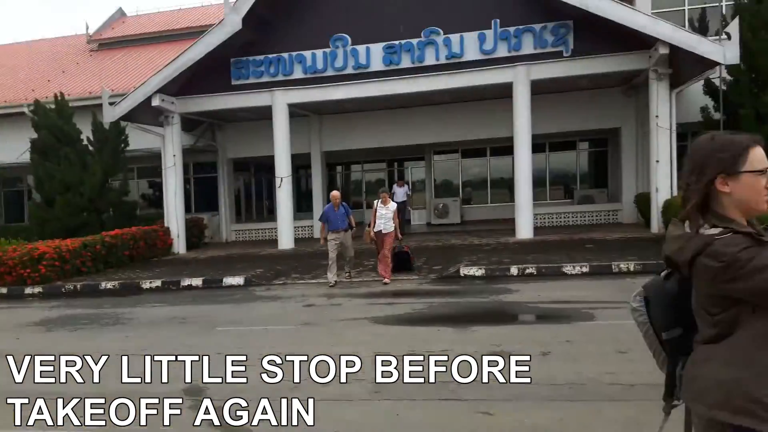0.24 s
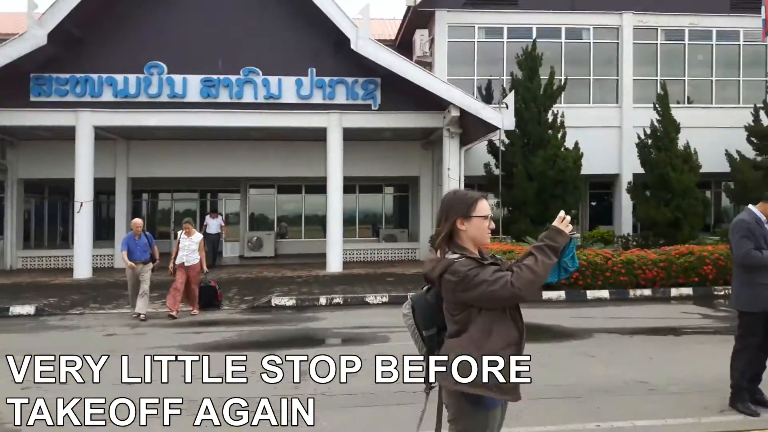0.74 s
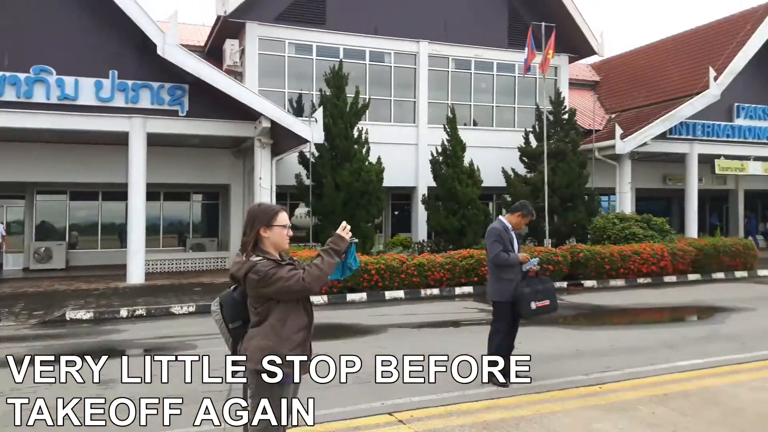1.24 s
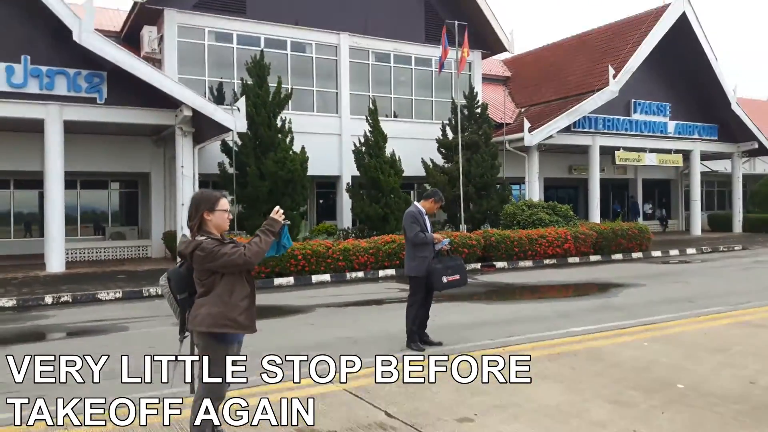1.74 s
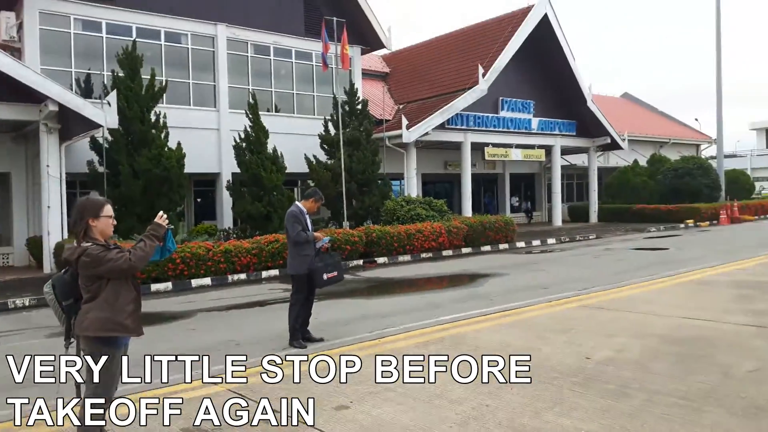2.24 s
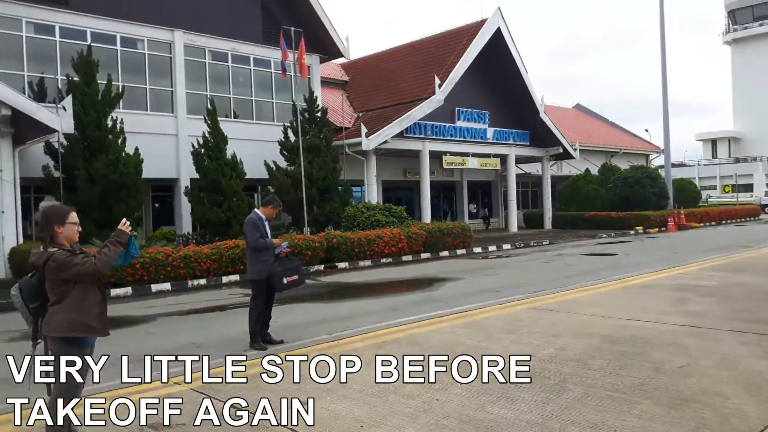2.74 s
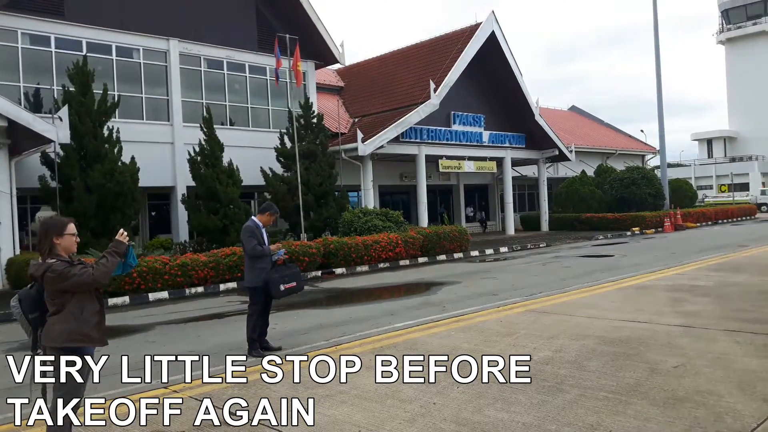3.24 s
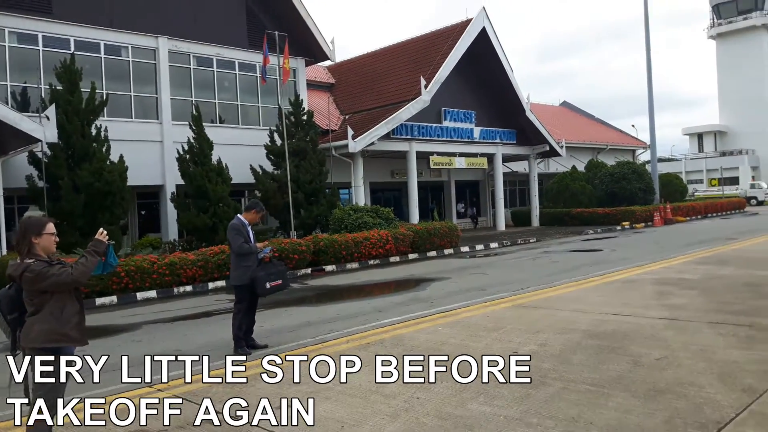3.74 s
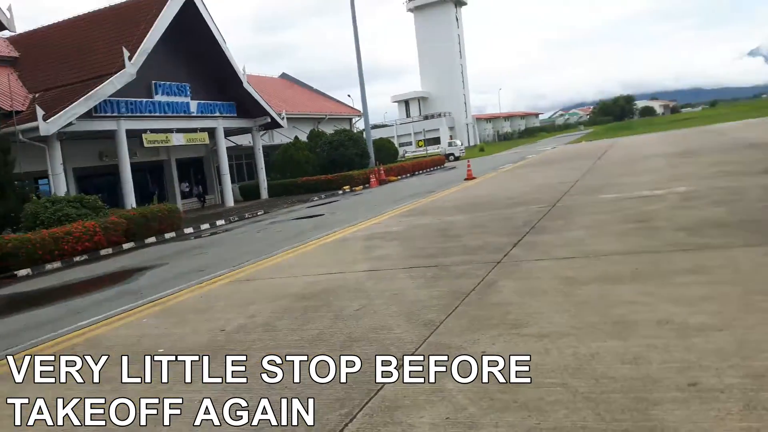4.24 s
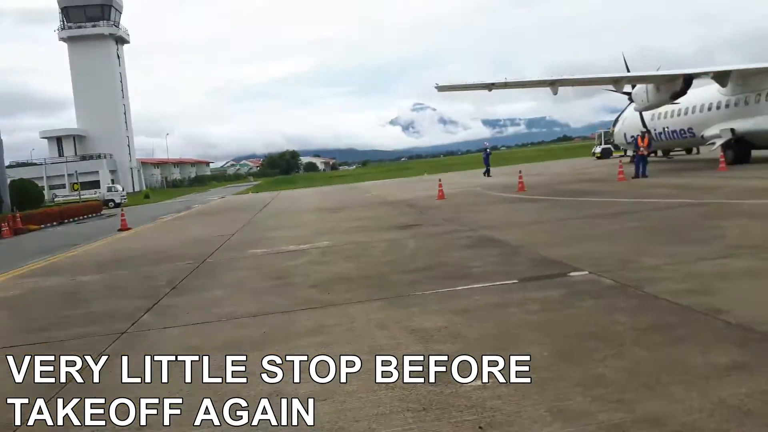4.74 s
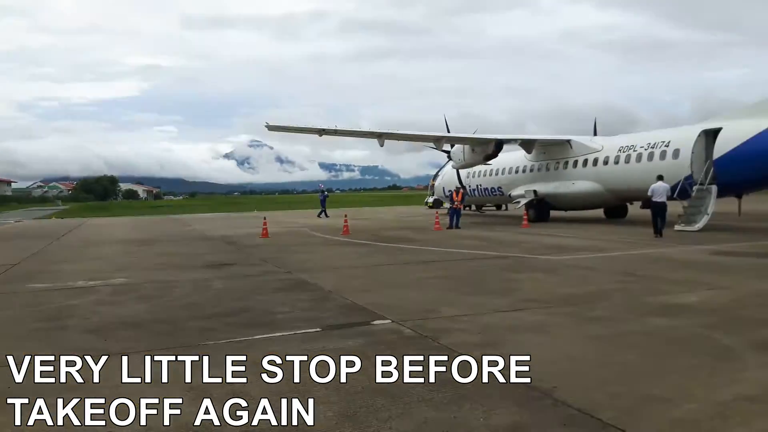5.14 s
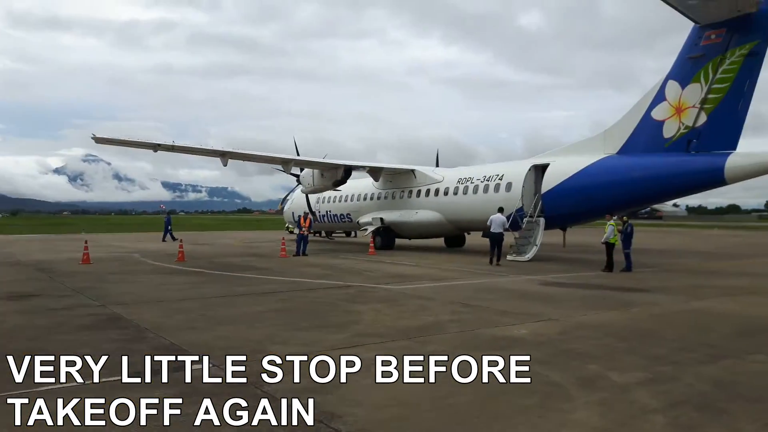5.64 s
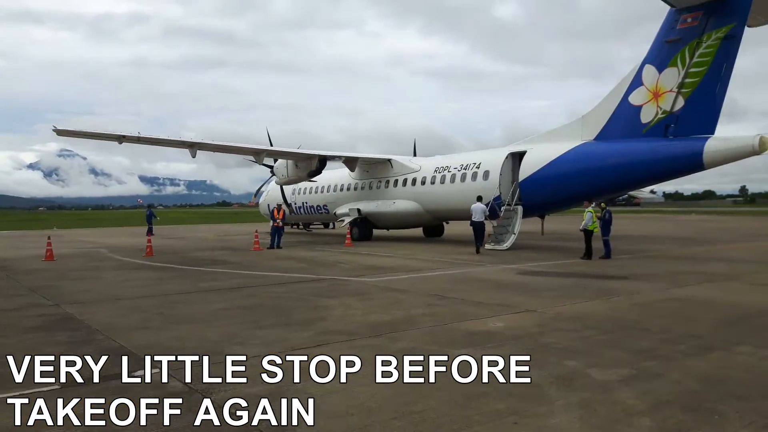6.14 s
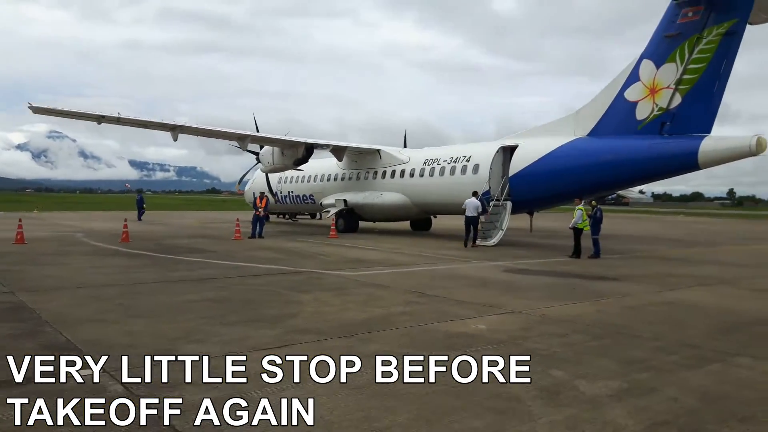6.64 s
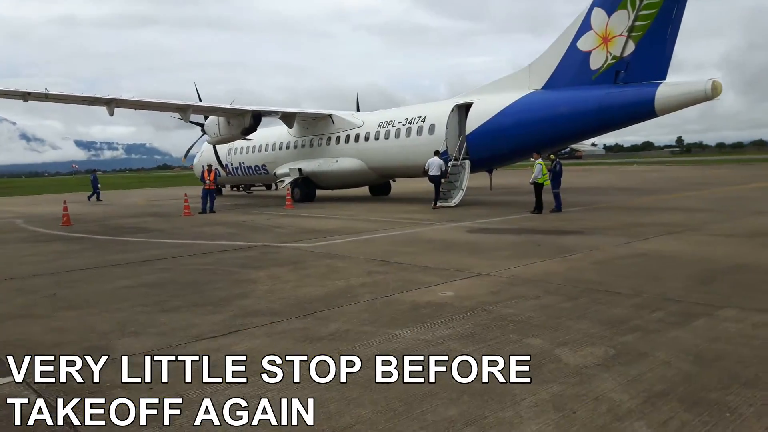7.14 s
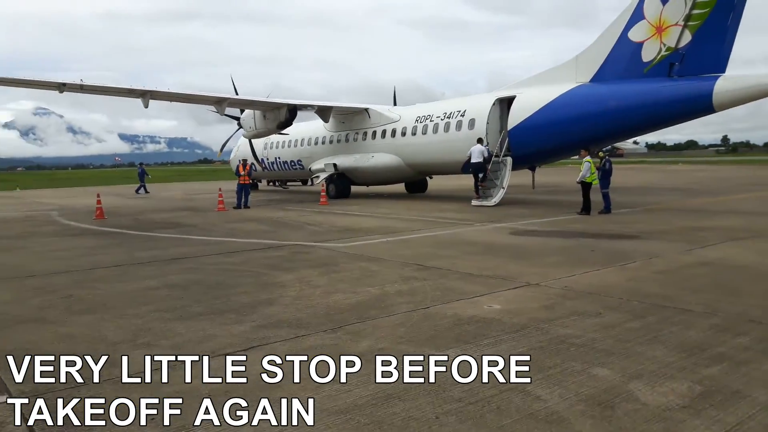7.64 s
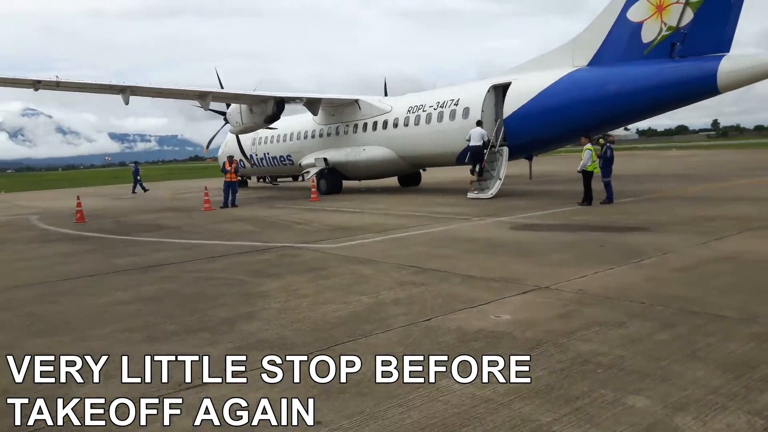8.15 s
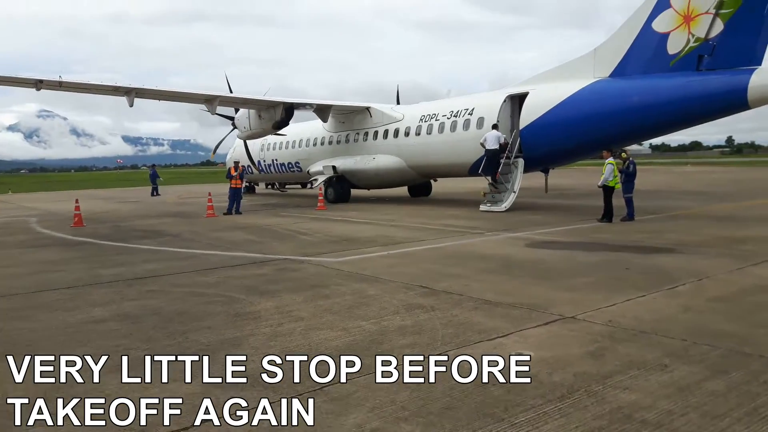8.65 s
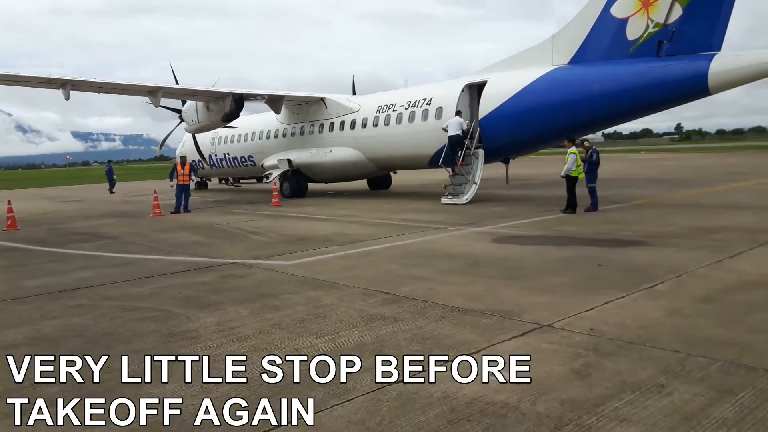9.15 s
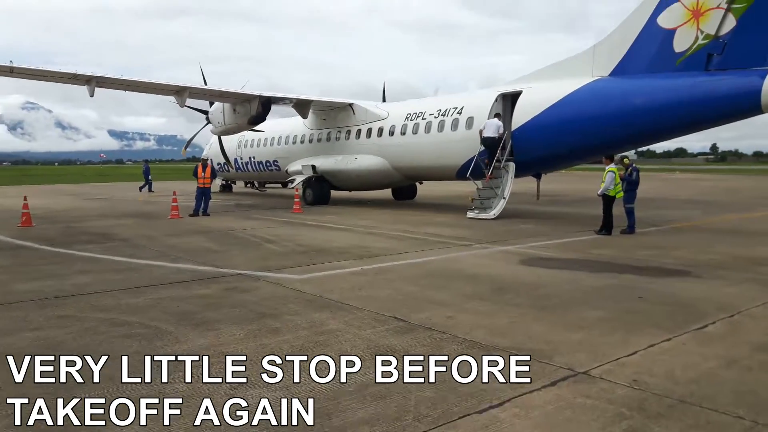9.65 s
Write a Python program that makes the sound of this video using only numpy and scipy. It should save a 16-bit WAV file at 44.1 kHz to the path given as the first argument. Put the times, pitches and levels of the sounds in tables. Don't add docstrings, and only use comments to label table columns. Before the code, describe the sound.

Loud gusts thump and crackle for under a second, giving way to an aircraft engine's uneven boom, growing hiss and rising rotor whine.

```python
import sys
import numpy as np
from scipy import signal
from scipy.fft import rfft, irfft
from scipy.io import wavfile
from scipy.ndimage import uniform_filter1d

SR = 44100
rng = np.random.default_rng(int(sys.argv[2]) if len(sys.argv) > 2 else 0)


def boost_factor(decibels):
    exponent = np.asarray(decibels, float) / 20
    return 10 ** exponent


def transcribe(signal):
    frames = np.atleast_2d(signal).T
    limited = np.clip(frames, -1, 1)
    pcm = np.round(limited * 32767).astype(np.int16)
    wavfile.write(sys.argv[1], SR, pcm)


N = 436149
T_S = np.arange(N) / SR
FRAMES, HZ = N // 256 + 5, np.fft.rfftfreq(1024, 1 / SR)[:, None]
FRAME_S = np.arange(FRAMES) * 256 / SR


def evened(x):
    return x / np.sqrt(np.mean(x ** 2) + 1e-20)


def smooth_twice(x, size):
    return uniform_filter1d(uniform_filter1d(x, size=size), size=size)


def blurred(x, bins, frames):
    return uniform_filter1d(uniform_filter1d(x, size=bins, axis=0), size=frames, axis=1)


def read(points, hz):
    f, value = np.transpose(points)
    return np.interp(np.log(hz + 1), np.log(f + 1), value)


def curves(rows, t):
    s, *columns = np.transpose(rows)
    return [np.interp(t, s, c) for c in columns]


def window(t, start, end, rise, fall):
    return np.clip((t - start) / rise, 0, 1) * np.clip((end - t) / fall, 0, 1)


def bump(t, center_s, half_s):
    return np.exp(-((t - center_s) / half_s) ** 2)


def add(mix, s, sound):
    part = mix[max(round(s * SR), 0):][:len(sound)]
    part += sound[:len(part)]


def band_db(shape_db, lo, hi):
    return 10 * np.log10(np.sum(boost_factor(shape_db) ** 2 * ((HZ > lo) & (HZ < hi)), axis=0) + 1e-20)


def turbulence(shape_db, patchy_db, flicker_db):
    a, b, patches = np.transpose(rng.standard_normal((FRAMES, len(HZ), 3)))
    patches = evened(blurred(patches, 9, 12))
    flicker = evened(uniform_filter1d(rng.standard_normal(FRAMES), size=10))
    z = (a + 1j * b) * boost_factor(shape_db + patchy_db * patches + flicker_db * flicker)
    return signal.istft(z, nperseg=1024, noverlap=768)[1][:N] * np.sqrt(0.5)


def low_noise(spectrum, level_db, steady, size=3500):
    hz = np.fft.rfftfreq(N, 1 / SR)
    noise = evened(irfft(rfft(rng.standard_normal(N)) * boost_factor(read(spectrum, hz)), N))
    beating = smooth_twice(noise ** 2, size)
    return evened(noise / beating ** (steady / 2)) * boost_factor(level_db)


def eddy(hz, ring):
    u = np.arange(-.008, .03, 1 / SR) * hz
    envelope = np.exp(-(u / np.where(u < 0, .65, ring)) ** 2)
    return np.cos(2 * np.pi * u) * envelope * signal.windows.tukey(len(u), .3)


def eddies(pitches, per_s, count):
    stream = np.zeros(count)
    for hz in pitches:
        size = boost_factor(4 * np.minimum(rng.exponential(1, count), 3))
        clicks = (rng.random(count) < per_s / SR) * rng.choice([-1, 1], count) * size
        stream += signal.oaconvolve(clicks, eddy(hz, ring=0.57))[:count] / hz ** 0.81
    return stream / np.sqrt(uniform_filter1d(stream ** 2, size=2500) + 1e-12)


# time in seconds, level in dB.
GUST = [
    (0, -13),
    (.085, -15.5),
    (.146, -9),
    (.185, -13),
    (.28, -3.5),
    (.46, -13.5),
    (.505, -15),
    (.585, -27),
    (.635, -12),
]


def gust_stream(count):
    t = np.arange(count) / SR
    gust_db = curves(GUST, t)[0] - 351 * np.maximum(t - GUST[-1][0], 0)
    thuds = eddies((90, 130, 180, 240, 320), 60, count)
    crackle = boost_factor(-23 + .4 * (gust_db + 15)) * eddies((380, 480, 620, 800, 1100), 90, count)
    fade = np.clip((count - np.arange(count)) / 3000, 0, 1)
    return (thuds + crackle) * boost_factor(gust_db - 9.0) * fade


def burst(db, hz, crack_db):
    slope = np.interp(db + crack_db, (-26, -12), (3.0, 2.2))
    crack = 0
    for tear_hz in (550, 800, 1200, 1750, 2500):
        part = eddy(tear_hz * rng.uniform(.85, 1.15), ring=1.2)
        late_s = rng.uniform(-1, 1) * .0008
        crack = crack + np.roll(part, round(late_s * SR)) * (900 / tear_hz) ** slope
    return boost_factor(db - 1.7) * (eddy(hz, ring=0.46) + boost_factor(crack_db - 0.5) * crack)


# time in seconds, level in dB.
BUFFET = [(0.0, -26), (0.36, -25), (1.54, -38.5), (1.68, -30), (3.58, -52), (4.35, -32), (4.74, -37.5),
          (6.83, -30.5), (6.94, -46), (8.54, -32), (9.61, -51), (9.89, -43)]
# frequency in Hz, density in dB per Hz.
BUFFET_SHAPE = [(15, -72), (25, -38), (54, -10), (81, -6), (97, -3.5), (110, -4), (140, -28), (240, -120)]
# time in seconds, peak in dB, pitch in Hz, crack in dB above the peak.
POPS = [(0.0287, 0.5, 216, -37), (0.0382, -20, 200, -31), (0.0482, -10, 262, -33),
        (0.0582, 1.5, 215, -18.5), (0.0917, -6, 280, -23), (0.1187, -5, 170, -39), (.132, -7, 200, -36),
        (0.1374, -8, 260, -13.5), (.1397, -5.5, 380, -12), (0.1442, 0.5, 195, -35), (.183, -15, 170, -39),
        (.198, -13, 220, -27), (0.22, -8, 250, -25), (0.23, -15, 260, -27), (0.239, -13.5, 280, -11.5),
        (0.2463, -7, 219, -27), (.2518, -8, 230, -37), (0.2602, -11, 240, -34.5), (0.265, -6, 230, -35),
        (0.2738, -6, 300, -26), (.281, -16, 200, -20), (.285, -11, 280, -32), (0.295, -5, 200, -20.5),
        (0.3041, -3.5, 217, -31), (0.3193, -7.5, 220, -20), (0.329, -3.5, 234, -29.5),
        (0.3425, -4, 260, -22), (0.3438, -8, 340, -16), (0.355, -3.5, 198, -26), (0.3702, -12, 280, -18),
        (.379, -11, 250, -32), (0.384, -8, 230, -36), (0.404, -9, 245, -18), (0.4226, -10, 200, -32),
        (0.433, -12.5, 302, -14.5), (0.4377, -14.5, 400, -19), (0.4467, -8.5, 200, -37),
        (0.4546, -12.5, 300, -23), (0.4928, -8, 220, -31), (0.506, -7.5, 170, -36), (0.5142, -7, 150, -40),
        (0.5352, -12, 228, -34), (.5422, -8.5, 179, -40), (0.5664, -13, 300, -34), (0.6034, -6, 198, -38),
        (0.617, -5.5, 249, -31), (.634, -15, 393, -23), (0.675, -13, 228, -38), (1.174, -11, 151, -45),
        (1.236, -16, 155, -36)]
# time in seconds, peak in dB, pitch in Hz, crack in dB above
MORE_POPS = [(.066, -15, 300, -26), (.109, -13, 200, -36), (.155, -9, 130, -42), (.523, -20, 350, -22),
             (0.5627, -18, 320, -24), (0.0342, -12, 300, -24), (.1386, -11, 1150, -7),
             (0.1413, -22, 1450, -11), (0.0257, -16, 520, -25), (.61, -16, 260, -34),
             (.6365, -18, 420, -22)]


def wind():
    count = int(.72 * SR)
    out = low_noise(BUFFET_SHAPE, curves(BUFFET, T_S)[0] + 0.47, steady=0.36)
    out[:count] += gust_stream(count)
    for s, db, hz, crack_db in POPS + MORE_POPS:
        add(out, s - .0081, burst(db, hz, crack_db))
    out = np.clip(out, -.97, .97)
    out = signal.sosfiltfilt(signal.butter(3, (46, 3300), "band", fs=SR, output="sos"), out)
    out[:700] += boost_factor(-7.5) * eddy(138, ring=0.32)[round(.008 * SR):][:700]
    return out


def drifting_dip(row, width_hz):
    start, end, from_hz, to_hz, depth_db = row
    center_hz = np.interp(FRAME_S, (start, end), (from_hz, to_hz))
    band = np.exp(-.5 * ((HZ - center_hz) / width_hz) ** 2)
    return depth_db * window(FRAME_S, start, end, .3, .3) * band


# frequency in Hz, width in Hz, lift in dB.
DUCT = [(605.5, 31, 8), (805, 38, 7.5), (1450, 54, -0.5), (2140, 110, 2), (2820, 33, -2.5), (3504, 58, 6)]
# start in seconds, end in seconds, from in Hz, to in Hz, depth in dB (negative lifts).
ECHOES = [(0.6, 1.6, 2300, 2600, 6), (4, 5.5, 2050, 2130, 7.5), (5.0, 10.2, 1870, 1710, 7),
          (0.5, 1.37, 2900, 3300, -6.5), (.85, 1.95, 3250, 4150, -5.5), (2.5, 4.4, 3000, 3400, -3.5),
          (4.5, 5.63, 2960, 2850, 8.5), (5.5, 10.2, 2400, 3430, 2.5), (-.3, .6, 3600, 3650, -4),
          (8.8, 10.2, 2250, 2300, -3), (-2, 1.9, 8500, 7400, 4), (.55, 1.2, 7550, 7400, 4),
          (4.0, 5.5, 7350, 7050, 4), (4.35, 5.5, 6350, 6500, 4), (5.2, 7.15, 7900, 8000, 10),
          (6.75, 8.4, 7620, 7550, 8), (8.1, 10.2, 7450, 7500, 6), (-.3, 2.3, 10000, 9400, 6),
          (4.1, 5.4, 10250, 10450, 10), (4.95, 5.85, 10400, 11900, 5), (6.8, 10.2, 11700, 11300, 3),
          (1.5, 4.4, 9700, 10100, 3)]
# start in seconds, end in seconds, from in Hz, to in Hz, depth in dB (negative lifts).
PORT = [(4, 6.2, 20000, 13000, -3), (2, .8, 15000, 14900, 0), (-1.5, 4.1, 11600, 12900, -2),
        (3.5, 3.3, 9500, 9600, -4), (6.5, 4.1, 13000, 9600, -0.5), (4.95, 6.1, 12900, 13300, -4),
        (1.4, 5.3, 15200, 15200, 2.5), (1.3, 4.33, 5000, 4900, 3), (0.5, 1.4, 4700, 6600, -11),
        (1.5, 5.3, 11300, 12700, -4.5), (3.5, 7.8, 28000, 12000, -5.5), (8.5, 8.8, 13000, 11000, -1.5),
        (1, 2.5, 12000, 13300, -4.5), (5, 5.1, 9200, 8000, 4), (3.5, 5.4, 8900, 10300, 2),
        (8, 6.1, 13200, 13000, 0.5), (2.5, 1.1, 3900, 4400, 0), (8.5, 11, 13600, 13500, -3),
        (4, 5.1, 8400, 8800, -4), (9, 7.2, 13500, 13500, 1.5), (-0.5, 2.2, 5600, 6100, 4),
        (1, 1.5, 14800, 14800, -1.5)]


def path_db():
    out = sum(db / (1 + (2 * (HZ - f) / w) ** 2) for f, w, db in DUCT) + 0 * FRAME_S
    ragged = evened(blurred(rng.standard_normal((FRAMES, len(HZ))).T, 4, 5))
    ragged = np.maximum(1 + .45 * ragged * np.clip(HZ / 7500, 0, 1) ** 2, .2)
    for row in ECHOES:
        out -= drifting_dip(row, width_hz=202 + 0.0081 * row[2]) * ragged
    for row in PORT:
        out -= drifting_dip(row, width_hz=590)
    return out


# time in seconds, level in dB, brightness in dB, turn towards the aircraft 0-1.
ENGINE = [(0.17, -59, -12.5, .5), (.4, -60, -12.5, 0.5), (.95, -53, -14.5, .6), (1.28, -52.5, -14.5, 1),
          (1.74, -41.5, -9, 0.5), (2.04, -41.5, -6.5, .5), (2.98, -38.5, -8.5, 0.1), (3.55, -37, -9, 0.1),
          (4.31, -36.5, -7, 0.6), (5.4, -39, -2, 0.48), (6.64, -38.5, 0, 0.72), (8.48, -34, -1, 0.6),
          (9.89, -33, -0.5, 0.64)]


def follow(t, near_db, share, bright_share):
    level_db, bright_db, _ = curves(ENGINE, t)
    return near_db + share * (level_db + 35) + bright_share * bright_db


def puff():
    return bump(FRAME_S, 2.99, 0.037)


SWING_S = 4.27, 5.54
# frequency in Hz, density in dB per Hz.
BOOM_AWAY = [(47, -51), (80, -21.5), (113, 1.5), (132, -4), (167, -31), (220, -23.5), (290, -18),
             (480, -120)]
BOOM_FACING = [(47, -55), (80, -22.5), (119, 4), (138, -1), (173, -19.5), (220, -18), (290, -44),
               (480, -120)]
# time in seconds, change in dB, half width in seconds.
SURGES = [(.9, -0.5, .15), (8.85, 0.5, 0.094), (1.44, -4.5, 0.2), (1.82, -0.5, .12), (2.24, -5.5, 0.086),
          (2.43, -4, .04), (2.64, -3.5, .07), (4.03, 3.5, 0.06), (5.3, -4.5, 0.5), (6.2, -2.5, .1),
          (6.38, -3, 0.065), (6.9, 0.5, 0.14), (7.1, -3.5, 0.06), (7.97, -3, 0.04), (9.8, 2.5, 0.087)]
# time in seconds, change in dB.
THROBS = [(0.96, 1), (1.17, 4), (1.24, 7), (1.32, 8), (1.59, -1), (1.66, 1), (1.72, 5), (1.83, 4.0),
          (1.89, 5.5), (1.96, 4), (2.02, 7), (2.31, 9), (2.53, 9), (2.58, 7), (2.84, 4), (3.03, 8),
          (3.1, 7), (3.43, 5.0), (3.66, 4.0), (3.9, 4), (4.02, 4.5), (4.26, 7), (4.49, 4.5), (4.73, 5),
          (4.99, 9), (5.07, 4), (5.44, 3.0), (5.51, 4), (5.65, 5), (5.84, 3), (5.95, 0), (6.02, 5.5),
          (6.08, 4), (6.18, 8), (6.25, 2.0), (6.5, 3), (6.57, 4), (6.79, 7.5), (6.9, 6.5), (6.97, 5),
          (7.21, 7.5), (7.5, 4), (7.58, 0), (7.65, 4.0), (7.72, 4.5), (7.8, 5.0), (7.9, 5), (8.18, 6.5),
          (8.34, 7), (8.59, 7), (8.75, 6.5), (8.95, 9.5), (9.24, 4), (9.36, 4), (9.47, 6), (9.62, 5.5),
          (9.7, 3.0), (9.81, 4.5)]
# time in seconds, change in dB.
LULLS = [(1.15, -9), (1.2, -6.0), (1.27, -8.0), (1.49, -11), (1.62, -13), (1.92, -11), (2.07, -13),
         (2.22, -4), (2.47, -8.0), (2.61, -20), (2.78, -14), (2.9, -6), (2.95, -14), (3.27, -19),
         (3.56, -9.0), (3.83, -12), (4.15, -2), (4.39, -11), (4.53, -8.0), (4.79, 1), (5.15, -4),
         (5.28, -4), (5.48, -12), (5.62, -8.0), (5.8, -14), (5.92, -8), (5.99, -10.0), (6.37, -6.0),
         (7.09, -8), (7.4, -6.0), (7.68, -11), (7.75, -13), (7.99, -7.0), (8.07, -3), (8.3, -8), (8.5, -1),
         (8.69, -11), (8.92, -10), (9.18, -5), (9.27, -9), (9.51, -11), (9.77, -4)]


def tailpipe_boom():
    boom_db = follow(FRAME_S, near_db=-16.5, share=0.22, bright_share=0.52)
    boom_db = boom_db + sum(db * bump(FRAME_S, s, w) for s, db, w in SURGES)
    boom_db = boom_db + sum(db * bump(FRAME_S, s, 0.017) for s, db in THROBS)
    boom_db = boom_db + sum(db * bump(FRAME_S, s, 0.011) for s, db in LULLS)
    level_db = np.interp(T_S, FRAME_S, boom_db - 1.0)
    away = low_noise(BOOM_AWAY, level_db, steady=0.64, size=600)
    facing = low_noise(BOOM_FACING, level_db, steady=0.64, size=600)
    angle = np.interp(T_S, SWING_S, (0, np.pi / 2))
    return np.cos(angle) * away + np.sin(angle) * facing


# frequency in Hz, density in dB per Hz.
ROAR_AWAY = [(260, -13.5), (450, 5), (511, -20), (612, -10.5), (690, -5), (1170, -7.5), (1900, -18),
             (2470, -44.5), (4180, -120)]
ROAR_FACING = [(260, -20), (450, -8), (729, -5.5), (807, -4.5), (1240, -15), (1360, -11.5), (1700, -18.5),
               (1900, -24), (2470, -56), (4180, -120)]


def combustion_roar(path):
    turn = np.interp(FRAME_S, SWING_S, (0, 1))
    shape = (1 - turn) * read(ROAR_AWAY, HZ) + turn * read(ROAR_FACING, HZ) + path
    roar_db = follow(FRAME_S, near_db=-27.5, share=0.76, bright_share=0.34) - band_db(shape, 520, 1500)
    return turbulence(shape + roar_db + 4 * puff(), patchy_db=0.52, flicker_db=-0.3)


# frequency in Hz, density in dB per Hz.
BODY = [(88, -32), (150, -4.5), (177, -9), (270, -4), (324, -7), (520, -22.5), (680, -28), (1140, -120)]


def exhaust(path):
    roar = combustion_roar(path)
    boom = tailpipe_boom()
    body_db = follow(T_S, near_db=-22.5, share=0.47, bright_share=0.041)
    return boom + low_noise(BODY, body_db, steady=0.49) + roar


# frequency in Hz, density in dB per Hz.
HISS_AWAY = [(880, -42), (1500, -14), (1820, -1), (2470, -4.5), (3510, 1), (4070, -5.5), (4360, -8),
             (5510, -13), (5960, -19), (7840, -18.5), (8560, -19.5), (9720, -19), (12100, -21),
             (13700, -20.5), (15600, -22)]
HISS_FACING = [(880, -37), (1500, 9.5), (1700, -1.5), (1950, 1.5), (2330, -2.5), (2810, -1.5), (3580, -1.5),
               (4110, -4), (5400, -4), (7540, -15), (8480, -11), (10600, -4.5), (11800, -7), (13600, -3),
               (15600, -13)]


def inlet(path):
    level_db, bright_db, turn = curves(ENGINE, FRAME_S)
    shape = (1 - turn) * read(HISS_AWAY, HZ) + turn * read(HISS_FACING, HZ)
    hiss = -band_db(shape + path, 1900, 4300)
    upper = follow(FRAME_S, near_db=-4.5, share=.03, bright_share=0.73) - band_db(shape, 4500, 7000)
    fizz = bright_db - band_db(shape + path, 8000, 15500)
    above_hiss, above_upper = (np.clip((HZ - f) / 600, 0, 1) for f in (4200, 7200))
    gain_db = hiss + above_hiss * (upper - hiss) + above_upper * (fizz - upper)
    puff_db = 5 * (HZ < 2600) * puff()
    return turbulence(shape + path + gain_db + level_db + puff_db + 0.03, patchy_db=0.78, flicker_db=0.36)


# time in seconds, shaft tone in Hz, compressor blade tone in Hz.
SPEED = [(0.0, 934, 3570), (1.0, 985, 3720), (2.0, 1044, 3860), (3.0, 1139, 4008), (4.0, 1238, 4178),
         (5.0, 1354, 4378), (6.0, 1460, 4538), (7.0, 1577, 4700), (8.0, 1704, 4918), (9.0, 1848, 5175),
         (9.89, 1995, 5410)]
SHAFT_1 = -22, [(1.7, .5, 9), (2.6, .3, 7), (3.2, .6, 14), (3.7, .75, 9), (4.4, .3, 7), (5.2, 2.4, 7),
           (8.6, .6, 4), (9.15, .65, 10)]
SHAFT_2 = -30, [(1.7, .9, 8), (3.2, .55, 5), (5.9, 2.1, 7), (8.55, .8, 14), (8.85, .35, 18), (9.1, .8, 9)]
SHAFT_3 = -31, [(3.0, .5, 9), (3.37, .55, 23), (3.7, .45, 18), (5.3, 1.3, 9), (6.84, .6, 19),
           (7.3, .65, 12), (8.7, .45, 12)]
BLADE = -30, [(1.65, 2.5, 13), (1.9, 1.2, 16), (4.0, 2.0, 10), (5.8, 1.1, 9), (6.84, .3, 15), (7.7, 2.5, 7)]
SIDE_1 = -33, [(3.2, 1.5, 7), (4.6, .6, 13), (5.0, 2.0, 10)]
SIDE_2 = -39, [(5.6, 1.2, 5), (7.7, 2.5, 8)]
INTAKE = -49, [(1.4, 1.1, 16), (2.2, 1.8, 20), (4.3, .8, 21), (4.9, .95, 27), (5.6, 3.8, 28)]


def whines():
    shaft, blade = (uniform_filter1d(c, size=SR // 2) for c in curves(SPEED, T_S))
    lines_hz = shaft, 2 * shaft, 3 * shaft, blade, blade + shaft, blade + 2 * shaft, 2.115 * blade
    engine_db = curves(ENGINE, FRAME_S)[0]
    out = np.zeros(N)
    for hz, (base_db, beams) in zip(lines_hz, (SHAFT_1, SHAFT_2, SHAFT_3, BLADE, SIDE_1, SIDE_2, INTAKE)):
        lifts_db = [db * window(FRAME_S, s, s + length, .06, .15) for s, length, db in beams]
        db = np.interp(T_S, FRAME_S, engine_db + base_db + np.max(lifts_db, axis=0))
        waver, fade = (evened(smooth_twice(v, 1100)) for v in rng.standard_normal((2, N)))
        wavering_hz = hz * (1 + .0015 * (1 + (hz / 8000) ** 2) * waver)
        tone = np.sin(2 * np.pi * np.cumsum(wavering_hz) / SR)
        out += boost_factor(db + 2.2 + hz / 4500 + 2.6 * fade) * tone
    return out


# time in seconds, peak in dB, pitch in Hz.
TINKLES = [(0.1765, -60, 8400), (.485, -74, 8500), (0.75, -71, 8900), (.785, -67, 8420), (.82, -68, 8420),
           (0.9981, -60, 8420), (1.4311, -51, 8430), (1.7265, -56, 8340), (1.8911, -51, 8850),
           (1.9126, -45, 8400), (1.9644, -47, 8380), (2.1394, -55, 8980), (2.3326, -43, 8870),
           (2.5606, -42, 8490), (3.473, -40, 8630)]


def tag():
    out, t = np.zeros(N), np.arange(4000) / SR
    for s, db, hz in TINKLES:
        ring = np.sin(2 * np.pi * hz * t)
        ring += rng.uniform(.1, .45) * np.sin(2 * np.pi * hz * 1.04 * t)
        ring += rng.uniform(0, .3) * np.sin(2 * np.pi * hz * 1.085 * t)
        add(out, s, boost_factor(db - 0.5 - 60 * t / 0.053) * ring * np.minimum(t / 0.00085, 1))
    return out


# start in seconds, length in seconds, pitch in Hz, level in dB.
HUMS = [
    (.66, .18, 732, -52),
    (3.55, .5, 1830, -57),
    (4.2, .8, 1778, -50),
    (3.815, .035, 1400, -41),
    (4.19, .03, 3000, -46),
    (5.563, .012, 2850, -44),
    (5.566, .01, 2500, -46),
    (7.9, .45, 1992, -54),
]


def ground_equipment():
    out = np.zeros(N)
    for s, length, hz, db in HUMS:
        t = T_S[:int(length * SR)]
        add(out, s, boost_factor(db + 5) * np.hanning(len(t)) * np.sin(2 * np.pi * hz * t))
    return out


def scene():
    path = path_db()
    engine = exhaust(path) + inlet(path) + whines()
    return (engine + ground_equipment() + wind() + tag())[None]


def starved(x):
    hz, t, z = signal.stft(x[0], SR, nperseg=1024, noverlap=768)
    block = np.arange(len(t)) // 4
    recovery = 2.5 * (t / .75) ** 2
    edge_hz = 13000 + 1100 * (rng.exponential(1, len(t))[block] + recovery)
    spared = rng.random((40, len(t)))[(hz / 600).astype(int)][:, block] < .2
    patch = uniform_filter1d(uniform_filter1d(abs(z) ** 2, size=4, axis=1), size=3, axis=0)
    nearby = uniform_filter1d(patch, size=60, axis=0)
    faint = (patch < boost_factor(2 * -9.6) * nearby) & (hz[:, None] > 5800)
    cut = (hz[:, None] > edge_hz) & ~spared
    lost = signal.istft(z * (faint | cut), SR, nperseg=1024, noverlap=768)[1][:N]
    return x - lost


def low_pass(x):
    return signal.sosfilt(signal.butter(12, 15700, fs=SR, output="sos"), x)


def record(dry):
    mix = starved(dry)
    return low_pass(mix)


dry = scene()
out = record(dry)
transcribe(out)
```